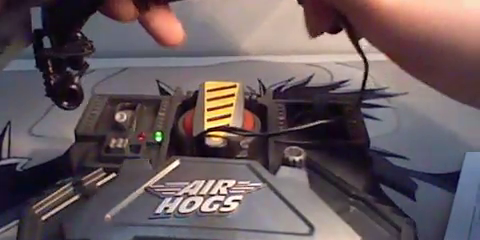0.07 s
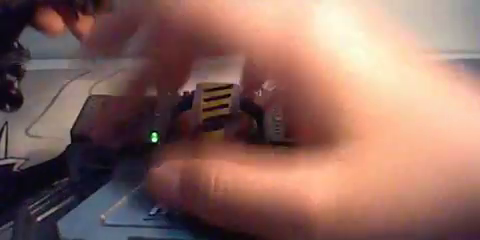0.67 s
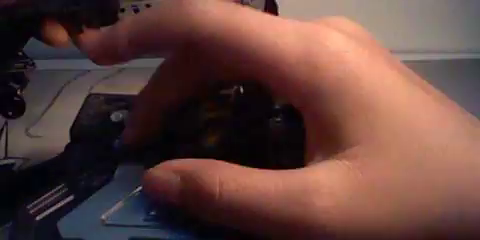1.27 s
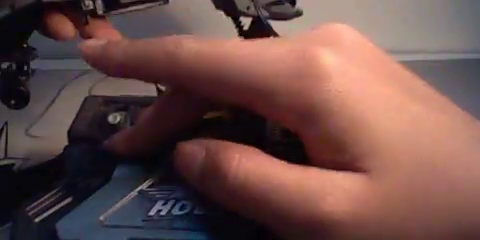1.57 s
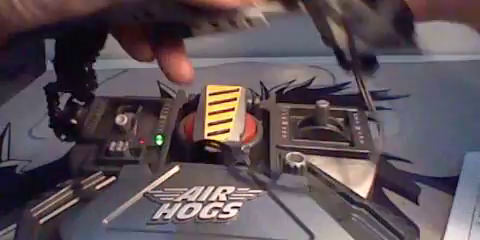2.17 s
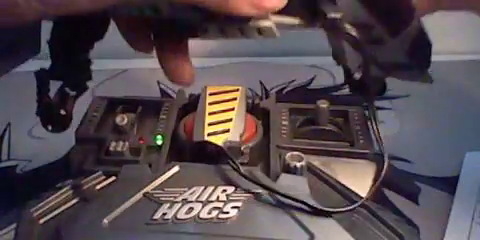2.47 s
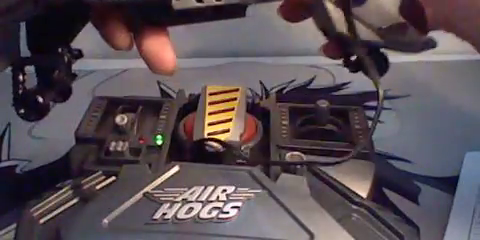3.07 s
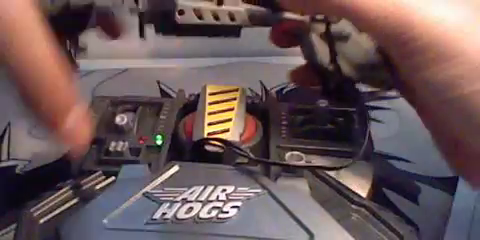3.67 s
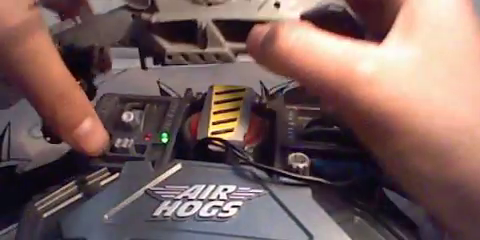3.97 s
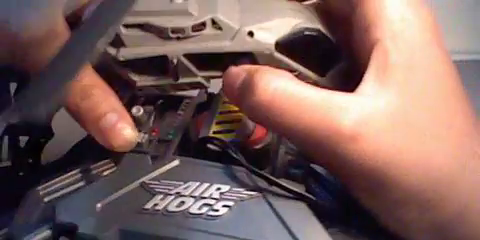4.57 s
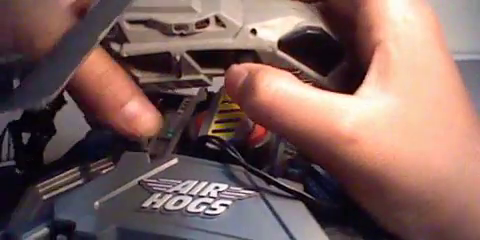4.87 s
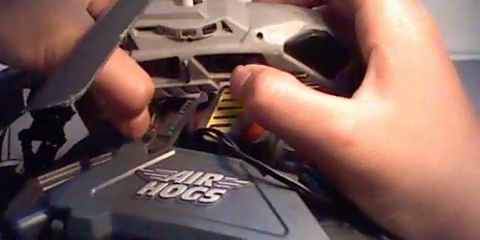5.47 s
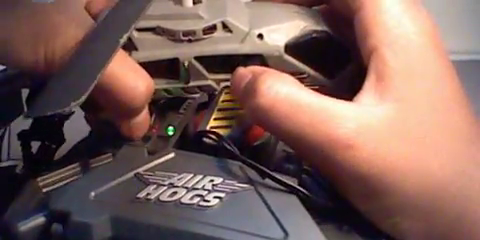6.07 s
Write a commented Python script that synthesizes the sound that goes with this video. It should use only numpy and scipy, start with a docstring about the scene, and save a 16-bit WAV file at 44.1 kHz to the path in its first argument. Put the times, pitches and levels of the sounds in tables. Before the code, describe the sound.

Light, irregular clicks and knocks of a hard plastic toy being handled on a desk, with soft cord rustles and low bumps.

```python
"""A desk in a small dry room: hands plug a charging cord into a toy helicopter and settle it on its base.
Each plastic contact is a scuffle of tiny impacts that excites the modes of the shell and the hollow base.
The cord knocks on the desk, pushes rock it, and cord and fingers rustle by stick-slip friction.
Rumble, hiss and a faint electrical flutter lie beneath; a small microphone limits the treble."""
import sys
import numpy as np
from scipy import signal
from scipy.fft import rfft, irfft
from scipy.io import wavfile
from scipy.ndimage import uniform_filter1d

SR = 44100
rng = np.random.default_rng(int(sys.argv[2]) if len(sys.argv) > 2 else 0)


def wrap_up_sound(samples):
    """Save the sound to the file named by the first command line argument, as 16-bit audio."""
    columns = np.atleast_2d(samples).T
    # keep every value between -1 and 1, then stretch to whole-number steps
    tamed = np.clip(columns, -1, 1)
    steps = np.round(tamed * 32767).astype(np.int16)
    wavfile.write(sys.argv[1], SR, steps)


N = 278712
TIME = np.arange(N) / SR
RING = TIME[:SR // 5]  # time axis of one impact

# pushes on the desk: (t/s, sway level/dB, boom level/dB)
PUSHES = [(.167, -36, -45), (.895, -31.5, -57), (1.2, -60, -43.5), (1.573, -35.5, -41), (1.673, -33.5, -46),
          (1.842, -35.5, -52), (3.953, -26, -40), (4.366, -50, -46.5), (4.769, -25.5, -50),
          (5.44, -42, -54)]
# fingers dragging on the shell: (middle t/s, half length/s, level/dB)
DRAGS = [(0.031, .011, -58.5), (3.645, .025, -65), (3.851, 0.032, -56.5), (3.968, .014, -48),
         (4.04, .016, -56), (4.385, 0.036, -53), (4.668, .028, -51), (5.06, .025, -59.5), (5.34, .024, -63)]


def plastic_contacts(hardest_s=.0022, doubling_db=25, lead_s=.015, build_s=.0009, split_hz=3100):
    """Impact excitation: softer contacts are longer and duller. Returns the close sound and room feed."""
    # plastic on plastic: (t/s, shell level/dB, touched part f/Hz, relative treble/dB, base level/dB)
    contacts = [(0.8735, -57, 1860, -5.5, -50.5), (0.9054, -49.5, 2200, -7.5, -37.5),
                (1.0501, -45, 1830, -8, -49), (1.0665, -45.5, 1670, -8, -43.5),
                (1.1979, -24.5, 2600, -.5, -32.5), (1.3506, -51, 1720, -6, -51.5),
                (1.3602, -44, 2450, -4, -46), (1.4375, -50, 2030, -7, -55),
                (1.5736, -36.5, 1870, -1.5, -35.5), (1.6712, -44.5, 2170, -6, -43.5),
                (1.6771, -44, 2380, -6, -40), (1.7382, -55, 2730, -1.5, -64),
                (1.9162, -46.5, 1870, -7, -50.5), (3.581, -56, 2690, -7, -72),
                (3.612, -53.5, 2600, -9, -75), (3.7915, -45, 3070, -9.5, -52.5),
                (3.8041, -55, 1660, -3.5, -40), (3.8559, -54, 2100, -7.5, -51),
                (3.9535, -44, 2100, -9, -50.5), (3.972, -47.5, 1560, -15, -52.5),
                (4.0624, -57, 1430, -13, -51.5), (4.2792, -45.5, 1950, -12, -51),
                (4.3563, -49.5, 2600, -9, -53), (4.4175, -53, 2230, -9, -60),
                (4.7585, -41.5, 3020, -5, -40.5), (4.7668, -36.5, 2900, -3, -39),
                (5.2275, -66, 1510, -10, -49), (5.4435, -67, 1480, -8.5, -51),
                (5.6118, -39.5, 1520, -8.5, -55), (5.613, -36, 2650, -11.5, -43)]
    close, room_feed = np.zeros((2, N))
    for s, db, part_hz, treble_db, base_db in contacts + finger_catches():
        contact_s = hardest_s * 2 ** (-treble_db / doubling_db)
        cutoff_hz = 5500 * undb(.38 * treble_db)
        force = scuffle(contact_s, lead_s)
        chatter = scuffle(1.32 * contact_s, lead_s + build_s / 2)
        tock = impact_level(hollow_base(force, s), base_db)
        shell_body = shell(force, part_hz, ring_db=4, part_db=-3.5)
        shell_treble = shell(chatter, part_hz, ring_db=-1, part_db=-24)
        for out, body, treble in ((close, shell_body, shell_treble), (room_feed, force, chatter)):
            body = band(body, 1080, split_hz, order=5)
            body = band(body, part_hz / 1.71, part_hz * 1.71, order=1)
            treble = band(treble, split_hz, 16800, order=5)
            treble = band(treble, 100, cutoff_hz, order=1)
            click = impact_level(body, db) + impact_level(treble, db + treble_db) + tock
            add(out, s - lead_s - build_s, click)
    return close, room_feed


def scuffle(contact_s, lead_s, rise=.6):
    """Superposed tiny impacts make a noisy force that swells to a peak at lead_s and dies away."""
    t = RING - lead_s
    return flat_noise(np.exp(np.minimum(t / (rise * contact_s), -t / contact_s)))


def shell(force, part_hz, ring_db, part_db, shell_t60=.03, part_t60=.0095):
    """Modal superposition: the dry crack, the ringing shell and the shorter ring of the touched part."""
    # bending modes of the thin shell: (f/Hz, level/dB)
    bending = [(1230, -10), (1567, 3), (1727, 1), (2200, -1), (2290, 0), (2440, -2), (2744, 0), (2833, 0),
               (3387, 2), (3578, 1), (3743, 2), (4371, 0), (4700, -1), (4978, 1), (5205, -2), (5531, 0),
               (5760, -3), (6270, -4), (7100, -3), (7402, -2)]
    # every contact point weights the modes in its own way; high modes die sooner
    weights = undb(3 * rng.standard_normal(len(bending)))
    phases = rng.uniform(0, np.pi, len(bending))
    modes = sum(weight * undb(db) * mode(hz, shell_t60 * np.sqrt(bending[1][0] / hz), phase)
                for (hz, db), weight, phase in zip(bending, weights, phases))
    ring = drive(force, modes)
    part = drive(force, mode(part_hz, part_t60, np.pi / 2))
    return impact_level(force, 0) + impact_level(ring, ring_db) + impact_level(part, part_db)


def hollow_base(force, s, free_hz=790, free_t60=.036):
    """Resonance of the hollow base at time s: a pressing hand lowers its note and damps it."""
    # note of the base: (t/s, f/Hz)
    notes = [(.87, 850), (.9, 705), (1.05, 797), (1.68, 792), (3.8, 660), (4.4, 657), (4.77, 760),
             (5.23, 685), (5.6, 803)]
    hz = np.interp(s, *np.transpose(notes))
    t60 = free_t60 * min(hz / free_hz, 1) ** 2
    return band(drive(force, mode(hz, t60)), 350, 1600, order=1)


def finger_catches(count=2, scatter_db=2.2, part_hz=2150, treble_db=-10):
    """Stick-slip: a dragging finger catches and lets go at random. Returns rows of faint contacts."""
    chance = rng.standard_normal((len(DRAGS), count, 3))
    return [(s + half_s * when, db - 5 + scatter_db * size, part_hz * np.exp(.18 * pitch), treble_db, db - 6)
            for (s, half_s, db), ticks in zip(DRAGS, chance) for when, size, pitch in ticks]


def cord_knocks(tick_t60=.011):
    """Impulse response of the desk top: a sharp tick, then freely decaying modes."""
    # the cord strikes the desk: (t/s, level/dB)
    knocks = [(0.1584, -36.5), (1.8497, -52)]
    # modes of the desk top: (f/Hz, t60/s, level/dB)
    desk_modes = [(134, 0.29, -19), (278, 0.055, 1), (370, 0.055, -7), (537, 0.016, -0.5),
                  (730, 0.058, -2.5), (1050, 0.011, 3.5), (1454, 0.04, -3.5), (2750, 0.027, -19),
                  (3170, 0.021, -19)]
    out = np.zeros(N)
    for s, db in knocks:
        wood = sum(rng.choice([-1, 1]) * undb(mode_db) * mode(hz, t60) for hz, t60, mode_db in desk_modes)
        tick = band(rng.standard_normal(len(RING)) * fade(tick_t60), 950, 3560, order=2)
        add(out, s, impact_level(wood, db) + impact_level(tick, db - 6))
    return out


def desk_pushes(sway_hz=33, sway_t60=.12, press_s=.0054):
    """Mass loading: a soft push sways the desk and stirs its lowest modes, which the hand detunes."""
    # lowest modes of the desk: (f/Hz, t60/s, level/dB)
    low_modes = [(80, 0.19, -0.5), (108, 0.076, -4), (136.7, 0.15, 2.5), (231.5, 0.088, -3.5)]
    out = np.zeros(N)
    onset = 1 - np.exp(-RING / press_s)
    for s, sway_db, boom_db in PUSHES:
        detuning = np.exp(.06 * rng.standard_normal(len(low_modes)))
        boom = sum(undb(db) * mode(hz * ratio, t60) for (hz, t60, db), ratio in zip(low_modes, detuning))
        add(out, s, onset * (undb(sway_db) * mode(sway_hz, sway_t60) + undb(boom_db) * boom))
    return out


def cord_swishes():
    """Sliding friction of cord and skin gives a soft, broad rustle."""
    # slides: (middle t/s, half length/s, level/dB)
    strokes = [(.04, 0.019, -62), (.222, 0.032, -52.5), (.555, 0.03, -54), (1.88, 0.017, -60.5),
               (1.96, 0.067, -56), (2.005, 0.017, -51), (2.2, 0.021, -62), (2.395, 0.048, -52.5)]
    # rustle spectrum: (f/Hz, density level/dB)
    spectrum = [(120, -7), (250, 7), (700, 5), (1400, 0), (2500, -6.5), (5000, -6.5), (8000, -21)]
    return friction(strokes, spectrum, grain_db=3, grain_hz=920)


def finger_drags():
    """Sliding friction of fingers on the shell gives a coarser rub."""
    # rub spectrum: (f/Hz, density level/dB)
    spectrum = [(200, -3.5), (500, -4), (750, 8), (1050, -9.5), (1500, 1), (2200, -2.5), (2900, -5),
                (3800, -12), (8000, -26)]
    return friction(DRAGS, spectrum, grain_db=4, grain_hz=600)


def weight_shifts(lag_s=.012, half_s=.085):
    """Slowly varying load: the hand's weight shifts around each push, rumbling more for harder ones."""
    # rumble spectrum: (f/Hz, density level/dB)
    spectrum = [(12, -20), (30, 2.5), (80, -1.5), (130, -7.5), (200, -22), (600, -48), (3000, -73)]
    strokes = [(s + lag_s, half_s, max(sway_db - 26, boom_db - 15)) for s, sway_db, boom_db in PUSHES]
    return friction(strokes, spectrum, grain_db=.5, grain_hz=22)


def friction(strokes, spectrum, grain_db, grain_hz):
    """Stick-slip noise: dense slips of uneven size swell and fade with each stroke."""
    speed = sum(undb(db) * np.exp(-((TIME - s) / half_s) ** 2 / 2) for s, half_s, db in strokes)
    grain = (TIME * grain_hz).astype(int)
    slips = rng.standard_normal(N) * undb(grain_db * rng.standard_normal(N)[grain])
    slips = colour(slips, spectrum)
    return slips / slips.std() * speed


def room(x, wall_db=-10.5, wall_s=.0098, wall_t60=.068, tail_db=-13, tail_t60=.26):
    """Early reflection from the wall behind the desk and a short diffuse tail, both fuller in the treble."""
    wall = np.pad(flat_noise(fade(wall_t60)), (int(wall_s * SR), 0))[:len(RING)]
    tail = flat_noise(fade(tail_t60) * (1 - np.exp(-RING / .0075)))
    radiated = (band(x, 200, 18000, order=1) + band(x, 2800, 17000, order=1)) / 2
    return signal.fftconvolve(radiated, undb(wall_db) * wall + undb(tail_db) * tail)[:N]


def noise_floor(dip_db=-3):
    """Stationary noise, with a shallow dip in the band of the flutter."""
    # room rumble and microphone hiss: (f/Hz, density level/dB)
    spectrum = [(12, -27), (20, 3), (54, -8.5), (71, -16.5), (124, -16), (200, -19), (233, -17.5),
                (439, -24), (486, -15.5), (626, -27), (786, -24), (939, -27.5), (1640, -29), (7120, -35.5),
                (8500, -45.5), (11000, -74), (18700, -120)]
    steady = level(colour(rng.standard_normal(N), spectrum), -56)
    return colour(steady, [(120, .0029), (250, dip_db), (500, dip_db), (650, 0)])


def electrical_flutter(cycle_s=.1, half_s=.0065):
    """Amplitude modulation: a low band of noise comes in three quick bursts per cycle."""
    # bursts: (t/s into the cycle, level/dB)
    bursts = [(0.021, -59.5), (.053, -63.5), (.089, -60.5)]
    gate = np.zeros(N)
    for s, db in bursts:
        from_peak_s = (TIME - s + cycle_s / 2) % cycle_s - cycle_s / 2
        gate += undb(db) * np.exp(-(from_peak_s / half_s) ** 2 / 2)
    return gate * level(band(rng.standard_normal(N), 190, 540, order=4), 0)


def undb(db):
    """Decibels to amplitude ratio."""
    return 10 ** (np.asarray(db) / 20)


def level(x, db):
    """Set the rms level."""
    return x * undb(db) / np.sqrt(np.mean(x ** 2))


def impact_level(x, db, reference_s=.01):
    """Equal energy: give a short sound the energy of reference_s at this level."""
    return x * undb(db) * np.sqrt(reference_s * SR / np.sum(x ** 2))


def add(out, s, x):
    """Superpose x on out from time s."""
    i = max(int(s * SR), 0)
    out[i:i + len(x)] += x[:max(N - i, 0)]


def band(x, lo_hz, hi_hz, order):
    """Causal band-pass."""
    return signal.sosfilt(signal.butter(order, [lo_hz, min(hi_hz, .45 * SR)], "band", fs=SR, output="sos"), x)


def colour(x, points):
    """Spectral shaping by (f/Hz, level/dB) points."""
    hz, db = np.transpose(points)
    f = np.maximum(np.fft.rfftfreq(N, 1 / SR), 1)
    return irfft(rfft(x) * undb(np.interp(np.log(f), np.log(hz), db)), N)


def fade(t60):
    """Exponential decay, by 60 dB in t60 seconds."""
    return np.exp(-np.log(1000) * RING / t60)


def mode(hz, t60, phase=0):
    """Damped harmonic oscillation."""
    return np.sin(2 * np.pi * hz * RING + phase) * fade(t60)


def drive(force, response):
    """Convolution of a force with an impulse response."""
    return signal.fftconvolve(force, response)[:len(RING)]


def flat_noise(envelope):
    """Whitening: noise of unit energy under an envelope, holding all frequencies about equally."""
    x = rng.standard_normal(len(RING)) * envelope
    for _ in range(4):  # flatten the spectrum, then restore the envelope
        x = irfft(np.exp(1j * np.angle(rfft(x))), len(RING))
        power = uniform_filter1d(x ** 2, size=64)
        x *= envelope / np.sqrt(power + envelope ** 2 * np.var(x) / 20 + 1e-12)
    return x / np.linalg.norm(x)


def scene():
    """Superposition of the direct sound, its reflections and the background."""
    close, room_feed = plastic_contacts()
    handling = cord_knocks() + cord_swishes() + finger_drags()
    rumble = desk_pushes() + weight_shifts()
    reflections = room(room_feed + handling)
    return (close + handling + reflections + rumble + noise_floor() + electrical_flutter())[None]


def record(dry):
    """Band limiting: the small microphone acts as a low-pass at 8400 Hz."""
    taps = signal.firwin(121, 8400, window=("kaiser", 7), fs=SR)
    return signal.fftconvolve(dry, taps[None], mode="same", axes=1)


dry = scene()
out = record(dry)
wrap_up_sound(out)
```